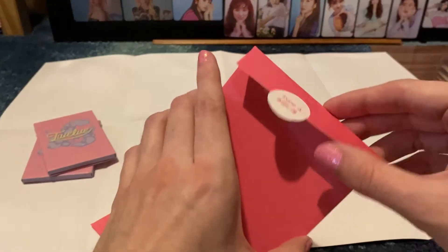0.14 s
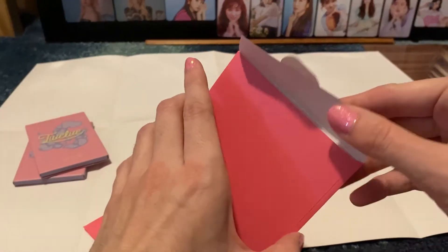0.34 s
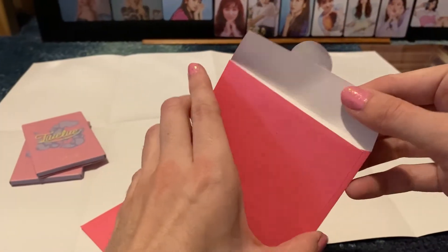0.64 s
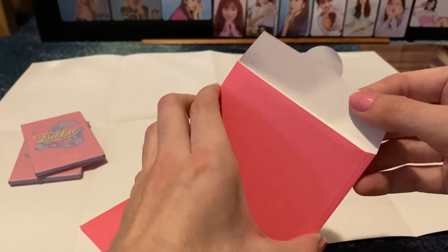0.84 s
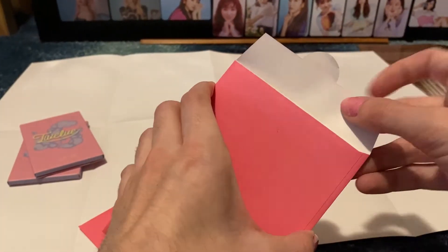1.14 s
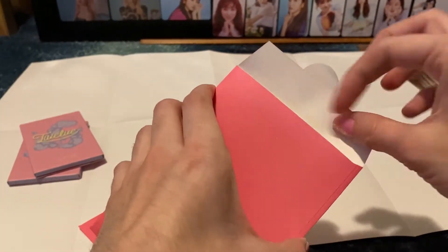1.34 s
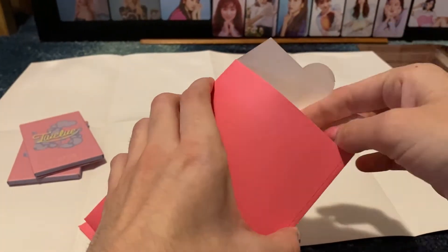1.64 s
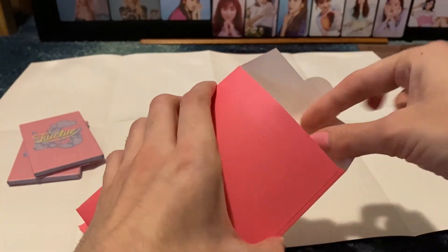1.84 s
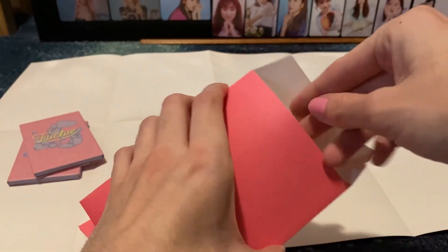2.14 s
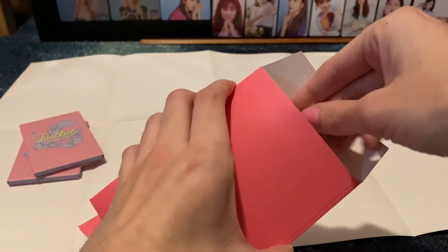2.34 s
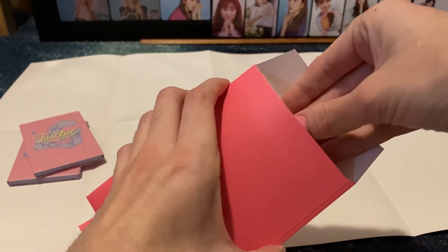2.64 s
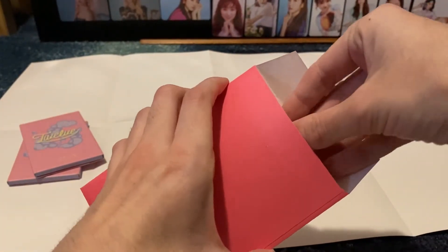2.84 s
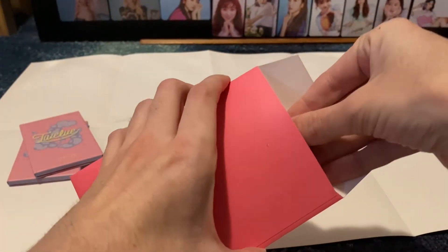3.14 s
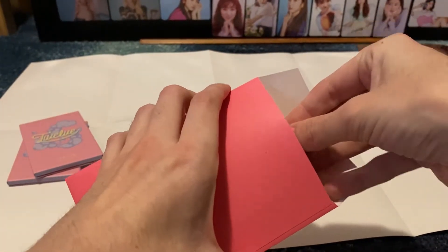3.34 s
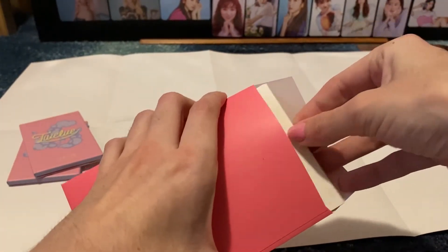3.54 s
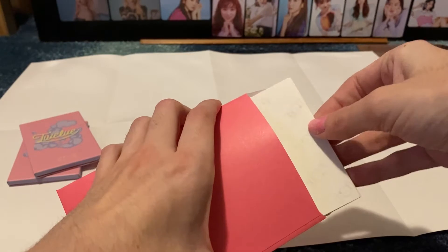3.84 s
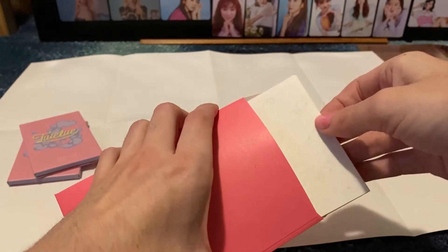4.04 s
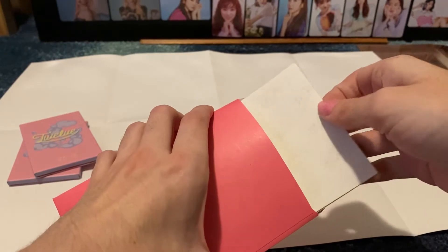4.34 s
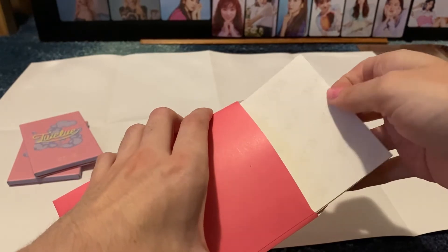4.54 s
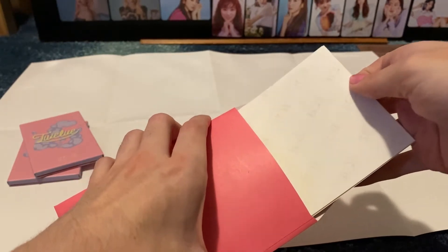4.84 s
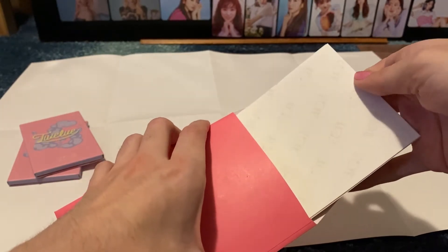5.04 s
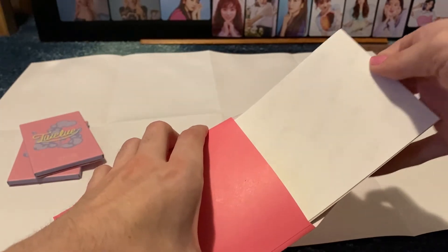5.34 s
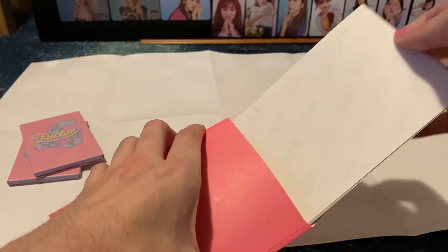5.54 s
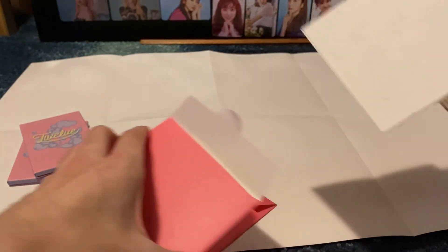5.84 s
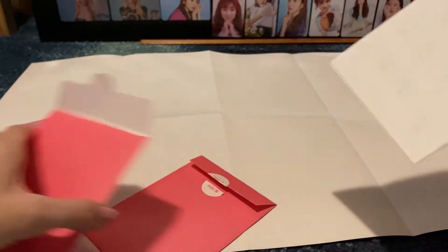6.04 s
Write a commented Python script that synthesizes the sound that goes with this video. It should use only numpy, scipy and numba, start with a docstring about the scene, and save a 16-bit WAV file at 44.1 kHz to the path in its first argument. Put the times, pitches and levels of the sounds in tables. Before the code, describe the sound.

Close dry paper handling: faint rustle, sudden crisp crackles and soft table thumps, busy scraping, a long sliding rub, then near silence.

```python
"""On a table in a quiet room, hands open the flap of a stiff paper envelope and draw out a folded card. Stick-
slip friction: paper rubs on paper as dense tiny slips that ring the sheet, pocket and fibres. Buckling: folds
give way in short crackles through the same resonances; a few even drags squeak faintly. The air cushion in the
envelope gives low thumps, each at its own pitch, over restless shaking of the table top and a quiet hush. A
phone hears it closely through two microphone ports, with a faint room tail."""
import sys
import numpy as np
from scipy import signal
from scipy.fft import rfft, irfft, next_fast_len
from scipy.io import wavfile
from scipy.ndimage import uniform_filter1d
from numba import njit

SR = 44100
rng = np.random.default_rng(int(sys.argv[2]) if len(sys.argv) > 2 else 0)


def master_out(mix):
    """Clip the mix to full scale and print it as 16-bit PCM to the path in sys.argv[1]."""
    frames = np.transpose(np.atleast_2d(mix))
    ceiling = np.clip(frames, -1, 1)
    pcm = np.round(ceiling * 32767).astype(np.int16)
    wavfile.write(sys.argv[1], SR, pcm)


N = 273772
M = next_fast_len(N)  # transform length


def undb(db):
    """Level definition: decibels to amplitude gain."""
    return 10 ** (np.asarray(db) / 20)


def unit(x):
    """Mean-square normalization: scaled to rms 1."""
    return x / np.sqrt(np.mean(x ** 2))


def curve(rows):
    """Linear interpolation in time: the columns of a (t/s, value, ..) table at every sample."""
    s, *columns = np.transpose(rows)
    return [np.interp(np.arange(N) / SR, s, c) for c in columns]


def on_bins(points):
    """Interpolation on a log frequency axis: (f/Hz, value) points at every transform bin."""
    hz, value = np.transpose(points)
    bins_hz = np.fft.rfftfreq(M, 1 / SR)
    return np.interp(np.log(bins_hz + 1), np.log(hz + 1), value)


def walk(rate):
    """Slow random modulation: levels held 1 / rate s and slewed, rms 1."""
    hold = int(SR / rate)
    steps = np.repeat(rng.standard_normal(N // hold + 1), hold)
    return unit(uniform_filter1d(steps, hold)[:N])


@njit
def band(x, hz, damping):
    """Resonance with a moving centre: a state-variable band-pass with gain 1 at the centre."""
    y, b, l = np.empty(len(x)), 0., 0.  # b and l are the band-pass and low-pass states
    for i in range(len(x)):
        g = np.tan(np.pi * hz[i] / SR)
        v = (b + g * (x[i] - l)) / (1 + g * (g + damping))
        b, l, y[i] = 2 * v - b, l + 2 * g * v, damping * v
    return y


def ring(x, modes):
    """Modal superposition: parallel resonances of alternating sign, passing white noise at rms 1."""
    def through(v):
        total = 0
        for k, (hz, width, db) in enumerate(modes):
            mode = signal.lfilter(*signal.iirpeak(hz, hz / width, SR), v)
            total = total + (-1) ** k * undb(db) * mode
        return total
    energy = np.sum(through(signal.unit_impulse(4096)) ** 2)
    return through(x) / np.sqrt(energy)


def slips(grain_db, patchy_db, rate):
    """Stick-slip friction: dense fibre slips of very uneven size, in patches as the grip wavers."""
    size_db = grain_db * rng.exponential(size=N) + patchy_db * walk(rate)
    return unit(undb(size_db) * rng.standard_normal(N))


# strokes of paper over paper: loudest at t/s, swell/s, fade/s, sheet drive level/dB,
# pitch f/Hz at which the free span of the sheet rings
STROKES = [(0.0, .05, 0.23, -67, 1960), (0.165, 0.16, 0.42, -63, 2150), (0.25, 0.086, 0.051, -74.5, 1120),
           (0.37, 0.06, 0.069, -87, 1794), (0.469, 0.04, .08, -70.5, 1860), (0.53, 0.077, 0.085, -69, 1910),
           (0.716, 0.034, 0.1, -68.5, 1950), (0.831, 0.057, 0.08, -64, 1980),
           (1.016, 0.1, 0.041, -56, 1970), (1.14, 0.39, 0.11, -64.5, 1780), (1.258, 0.14, 0.067, -68, 2400),
           (1.4, 0.092, 0.2, -77, 1510), (1.486, 0.043, 0.025, -51, 2000),
           (1.565, 0.043, 0.05, -50.5, 1560), (1.625, 0.069, .11, -50.5, 1830),
           (1.731, 0.023, 0.03, -56.5, 1720), (1.78, 0.02, 0.12, -58.5, 1950),
           (1.9, 0.071, 0.063, -72, 1720), (1.994, 0.068, 0.03, -67.5, 1580),
           (2.052, 0.065, 0.064, -71, 1960), (2.162, 0.0097, 0.1, -56.5, 1470),
           (2.275, 0.036, 0.032, -53, 1660), (2.351, 0.051, 0.14, -49.5, 1600),
           (2.431, 0.13, 0.15, -47.5, 1780), (2.62, 0.047, 0.028, -54.5, 1466),
           (2.695, 0.053, 0.056, -57.5, 2030), (2.742, 0.01, 0.085, -55, 1360),
           (2.805, .05, 0.085, -55.5, 1850), (2.88, 0.027, 0.036, -60, 1970),
           (2.936, 0.034, 0.018, -61, 1520), (2.965, .02, 0.14, -60.5, 1510), (3.09, .04, 0.05, -77, 1650),
           (3.174, 0.045, 0.069, -66.5, 1780), (3.274, 0.052, 0.079, -53, 1900),
           (3.372, 0.03, 0.069, -53.5, 1950), (3.44, 0.027, 0.057, -56, 2310),
           (3.51, 0.093, 0.09, -53, 2000), (3.644, 0.21, 0.018, -48, 2100),
           (3.725, 0.092, 0.084, -53, 2070), (3.822, 0.042, 0.019, -50, 1840),
           (3.86, 0.044, .03, -69, 1800), (3.89, 0.016, 0.1, -57, 1800), (3.961, 0.041, 0.013, -49.5, 2330),
           (3.99, 0.048, 0.41, -60, 2040), (4.3, 0.12, 0.26, -57.5, 1930), (4.369, 0.21, 0.04, -55, 2070),
           (4.45, 0.078, 0.073, -63.5, 1850), (4.502, 0.027, 0.23, -55.5, 1820),
           (4.684, 0.21, 0.12, -54.5, 1980), (4.819, 0.14, 0.053, -63, 1530),
           (4.9, 0.068, 0.079, -60, 1170), (5.009, 0.013, 0.053, -67.5, 1510),
           (5.045, 0.014, .03, -76, 1250), (5.14, 0.031, 0.099, -74, 1310), (5.28, 0.097, 0.17, -57, 1100),
           (5.38, 0.04, 0.073, -58.5, 920), (5.47, 0.15, 0.055, -60.5, 930),
           (5.546, 0.089, 0.062, -50, 1840), (5.6, .03, 0.044, -75, 916), (5.981, .025, 0.092, -79, 1820),
           (6.09, 0.078, 0.073, -74, 1820), (6.149, 0.02, .045, -70, 2100),
           (6.21, 0.071, 0.041, -70.5, 1920)]
SWELL_POWER, FADE_POWER = 0.99, 1.31  # 1 = straight ramp in amplitude, more = more pointed
REST_DB, REST_HZ = -97.5, 1700  # paper barely touching


def strokes():
    """Power addition: swelling and fading strokes sum in power, and the stronger weigh more in pitch."""
    t = np.arange(N) / SR
    power = np.full(N, undb(2 * REST_DB))
    octaves = power * np.log2(REST_HZ)
    for s, swell, fade, db, hz in STROKES:
        up = np.clip(1 + (t - s) / max(swell, .002), 0, 1) ** SWELL_POWER
        down = np.clip(1 - (t - s) / max(fade, .002), 0, 1) ** FADE_POWER
        own = (undb(db) * up * down) ** 2
        power = power + own
        octaves = octaves + own * np.log2(hz)
    return 10 * np.log10(power), 2 ** (octaves / power)


# what rubs: t/s, hollow pocket level/dB, fibre hiss level/dB,
# both relative to the sheet drive of a middling stroke
SURFACE = [(0.0, -1.5, 1.5), (0.15, -5, -7), (0.25, -5, -0.5), (0.36, -13.5, -11.5), (0.47, -17, 6),
           (0.95, -12, -4.5), (1.2, -11, 1.5), (1.55, -6.5, 0), (1.75, -12.5, -9), (2.05, -14, -4),
           (2.2, -7, -10), (2.47, -8, -7), (2.62, -13.5, -9), (2.96, -10, -6), (3.15, -19.5, -11),
           (3.4, -13, -6), (3.62, -13, -10.5), (3.95, -17.5, -7), (4.2, -14, -11), (4.75, -11.5, -7.5),
           (5.1, -7, -8.5), (5.5, -7.5, -8.5), (5.6, -0.5, -6), (5.68, -13.5, -1), (5.95, -14, 0),
           (6.21, -20.5, 0.5)]
MIDDLING_DB = -62
POCKET_FOLLOW, HISS_FOLLOW = 0.55, 0.98  # dB gained per dB of sheet drive


def rubbing(ring_db):
    """Friction excitation: slips drive sheet, pocket and fibres; catches jolt sheet and fibres together."""
    pocket_db, hiss_db = curve(SURFACE)
    effort_db = ring_db - MIDDLING_DB
    catches = undb(1.1 * walk(160))
    pocket_gain = undb(MIDDLING_DB + pocket_db + POCKET_FOLLOW * effort_db)
    hiss_gain = undb(MIDDLING_DB + hiss_db + HISS_FOLLOW * effort_db)
    return [undb(ring_db) * catches * slips(1.4, 1.0, 45),
            pocket_gain * slips(1.3, 3.9, 30),
            hiss_gain * catches * slips(1.2, 1.2, 60)]


# sudden cracks of a fold: t/s, envelope peak level/dB before the crest allowance,
# pocket level/dB and hiss level/dB relative to it, ringing pitch f/Hz, decay time constant/ms
CRACKS = [(0.0655, -46, -32, 0, 2170, 0.94), (1.4529, -35.5, 1, -9.5, 1100, 3.6),
          (1.491, -25, -1.5, -22, 1900, 3.6), (1.5418, -24, -2, -16, 1420, 3.4),
          (1.731, -43, -26, -22, 1670, 2.2), (1.7726, -56, -7.5, -12, 2000, 3.3),
          (1.8057, -48, -15, -4, 2120, 3), (1.9808, -53.5, -13, -16, 1450, 6.8),
          (2.0393, -52, -21.5, -7, 1960, 2), (2.1513, -35, -12.5, -8, 1500, 3.6),
          (2.1876, -38.5, -5, -42, 1350, 8.4), (2.194, -43, 8.5, -15, 1360, 3.6),
          (2.2098, -22, -7.5, -8.5, 1600, 6.7), (2.231, -31, -28, -4.5, 2490, 6.7),
          (2.3081, -36.5, -0.5, -7.5, 1580, 1.6), (2.587, -46, -24, -21, 1440, 2.2),
          (2.741, -44.5, -19, -19, 1450, 3.3), (2.9405, -28.5, -12.5, -13.5, 1400, 6.7),
          (3.0453, -46.5, -29.5, -23.5, 1690, 1.3), (3.2198, -48.5, -24, -28.5, 1380, 2.7),
          (3.313, -44.5, -10, -30, 1640, 3.4), (3.8816, -44, -20, -5.5, 1790, 3.5),
          (4.5975, -46.5, -11, -23, 1500, 2.3), (5.008, -53, -24, -10, 1510, 2.8),
          (5.038, -57, -5, -22.5, 1250, 3.1)]
# scrunches that swell first: same columns
SCRUNCHES = [(1.5012, -28.5, -6.5, -3.5, 2370, 9.2), (1.5222, -21, -7.5, -21, 1510, 7),
             (1.5292, -18, -19, -17, 1450, 4.1), (1.5505, -35.5, -1, -14, 1620, 6),
             (1.6072, -38.5, -29, -7.5, 1710, 3.1), (2.2179, -31, -12.5, -6.5, 1550, 4.4),
             (2.223, -34.5, 2, -23, 1360, 10.3), (2.2425, -35.5, 0, -8, 2560, 7.2),
             (2.255, -40.5, -4.5, -10, 1380, 7.1), (2.2694, -48, -12, -3, 1440, 3),
             (2.3984, -41, -15, -19, 1840, 2.1), (2.7515, -49, -13, -24, 1440, 5.9),
             (2.785, -43.5, -8.5, -14, 2530, 10.7), (2.9504, -51, -21, -25, 1360, 2.4),
             (3.3628, -49.5, -28.5, -14, 1860, 12), (3.6365, -31.5, -19, -13, 2360, 2.8),
             (3.8211, -38.5, -13, -32, 1540, 2.6), (3.9578, -35.5, -48, -3.5, 2550, 6.1),
             (5.5393, -36, -21, -11, 2390, 2.9), (5.58, -48.5, 0.5, -14, 2140, 3.1)]
CRACK_RISE_MS, SCRUNCH_RISE_MS = 0.28, 1.5
SNAP_DB = 7.5  # first click of a crack above its crackle envelope
CRACKLE_CREST_DB = 6  # crest allowance: all buckle forces are lowered by this


def buckles(span_hz):
    """Buckling instability: brief crackling forces, each setting the ringing span for 15 ms."""
    age_ms = np.arange(2048) / SR * 1000
    force, span_hz = np.zeros((3, N)), span_hz.copy()
    rows = [(*r, CRACK_RISE_MS) for r in CRACKS] + [(*r, SCRUNCH_RISE_MS) for r in SCRUNCHES]
    for s, db, pocket_db, hiss_db, hz, fall, rise in sorted(rows):
        shape = (1 - np.exp(-age_ms / max(rise, .05))) * np.exp(-age_ms / max(fall, .5))
        gains = undb([db, db + pocket_db, db + hiss_db])
        i = int(s * SR)
        force[:, i:i + 2048] += np.outer(gains, shape / shape.max())
        span_hz[i:i + int(.015 * SR)] = hz
    force = force * [slips(1.1, 1.3, 300), slips(1.0, 4.0, 200), slips(1.3, 1.2, 400)]
    # each crack snaps once, 0.6 ms after its onset
    for s, db, pocket_db, hiss_db, *_ in CRACKS:
        levels_db = np.array([db, db + pocket_db, db + hiss_db])
        force[:, int((s + .0006) * SR)] -= undb(levels_db + SNAP_DB)
    return undb(-CRACKLE_CREST_DB) * force, span_hz


# bending modes of the sheet at rest: f/Hz, width/Hz, relative level/dB before the span weighting
SHEET = [(940, 200, -4), (1177, 160, -0.5), (1448, 108, 3), (1786, 240, -1), (2116, 150, 2.5),
         (2352, 325, 2.5), (2586, 420, 1.5), (3120, 210, -2)]
# resonances of the hollow pocket: f/Hz, width/Hz, relative level/dB
POCKET = [(239, 90, 1.5), (424.6, 420, 1), (572, 338, 4), (837, 340, -5)]
# broad resonances of the fibres: f/Hz, width/Hz, relative level/dB
FIBRES = [(3630, 710, -4.5), (4880, 1200, -4.5), (6930, 2150, -3), (10360, 4760, -7.5), (12930, 4060, -9.5)]


def paper(force, span_hz, bend):
    """Modal response: forces ring sheet, pocket and fibres; bending shifts and weights each sheet mode."""
    sheet, power = 0, 0
    for k, (hz, width, db) in enumerate(SHEET):
        # pitch takes the neighbouring mode's bend, weight takes the mode's own
        mode = band(force[0], hz * (1 + 0.041 * bend[k - 1]), width / hz)
        # modes far from the pitch of the free span are held still
        octaves_off = np.log2(hz / span_hz)
        weight = undb(db + 2.2 * bend[k] - 8.64 * octaves_off ** 2)
        sheet = sheet + (-1) ** k * weight * mode
        power = power + weight ** 2 * np.pi * width / SR
    # the same force is shared among whichever modes are free
    return sheet / np.sqrt(power) + ring(force[1], POCKET) + ring(force[2], FIBRES)


# even drags on which the sheet sings: start t/s, length/s, level/dB, f/Hz
SQUEAKS = [(0.0, 0.24, -73, 2130), (0.01, 0.18, -68, 3070), (1.28, .14, -80.5, 1530),
           (2.582, 0.069, -63.5, 1430), (2.74, 0.035, -55.5, 1440)]
SQUEAK_DAMPING = .05  # bandwidth / centre frequency


def squeaks():
    """Narrow-band friction tones: noise through a sharp resonance, under a half-sine swell."""
    t, out = np.arange(N) / SR, 0
    for s, length, db, hz in SQUEAKS:
        swell = np.sin(np.pi * np.clip((t - s) / length, 0, 1))
        tone = unit(band(rng.standard_normal(N), np.full(N, 1. * hz), SQUEAK_DAMPING))
        out = out + undb(db) * swell * tone
    return out


# thumps of the air cushion in the envelope: t/s, level/dB before the rise and decay, f/Hz
THUMPS = [(0.05, -47.5, 120), (1.458, -44, 136), (1.469, -36.5, 93), (1.532, -28, 239),
          (1.543, -28.5, 72.5), (1.791, -60, 67), (2.155, -49, 100), (2.217, -47, 233),
          (2.227, -24.5, 93.4), (2.417, -55, 111), (2.585, -53.5, 132), (2.946, -50.5, 104),
          (3.62, -52, 125.3), (3.831, -53.5, 114), (4.905, -55.5, 125.5), (5.01, -64.5, 69.7),
          (5.736, -48.5, 121.6), (5.74, -52, 201.4), (5.748, -41, 62.1), (5.869, -66, 97.7)]
THUMP_CYCLES = 7.1  # to fade by 60 dB


def thumps():
    """Damped free vibration: each thump of the envelope's air cushion starts a decaying sine at its own pitch."""
    out = np.zeros(N)
    age = np.arange(SR // 4) / SR
    for s, db, hz in THUMPS:
        decay = 1000 ** (-age * hz / THUMP_CYCLES)
        rise = 1 - np.exp(-age / 0.002)
        i = int(s * SR)
        out[i:i + len(age)] += undb(db) * np.sin(2 * np.pi * hz * age) * decay * rise
    return out


# modes of the table top: f/Hz, width/Hz, relative level/dB
TABLE = [(53, 15, 3.5), (103, 72.5, -1), (166, 110, -4.5), (227.8, 51, -11.5)]
# restless hands on the table: t/s, level/dB about which it wavers
SHAKE = [(0.0, -64), (0.41, -74.5), (0.8, -79.5), (1.11, -68), (1.5, -75), (2.1, -76), (2.3, -58.5),
         (2.5, -68), (3.08, -77.5), (3.25, -67.5), (3.85, -70.5), (4.38, -78.5), (4.74, -71), (5.1, -72.5),
         (6.21, -76)]


def shaking():
    """Random forcing of modes: wavering noise from restless hands rings the table top."""
    level_db = curve(SHAKE)[0] + 2 * walk(12)
    return undb(level_db) * ring(rng.standard_normal(N), TABLE)


# spectrum of the room hush: f/Hz, relative level/dB per Hz
AIR = [(18, -44), (30, 5), (88, -9), (184, -18.5), (287, -13.5), (684, -40), (780, -23.5), (6210, -35),
       (7090, -33), (16000, -45.5)]
AIR_DB = -80


def air():
    """Stationary filtered noise: the quiet room hush."""
    spectrum = rfft(rng.standard_normal(M)) * undb(on_bins(AIR))
    return undb(AIR_DB) * unit(irfft(spectrum, M)[:N])


def tail(t60):
    """Diffuse reverberation: a noise response of unit energy that fades by 60 dB in t60 s."""
    age = np.arange(SR // 2) / SR
    h = rng.standard_normal(len(age)) * 1000 ** (-age / t60)
    return h / np.sqrt(np.sum(h ** 2))


# unequal paths to the two ports: f/Hz, phase by which the left port leads/rad
PORTS = [(1200, 0), (2400, .25), (4300, .7), (5200, .3), (6400, 2.4), (7250, 3.14), (8200, 3.7),
         (10300, 6.28), (11200, 6.6), (12500, 8.7), (13600, 9.42), (14500, 9.9), (16000, 12.6)]
# unrelated side sound: f/Hz, level/dB
SPREAD = [(60, -38), (150, -5), (350, -4.5), (800, -1), (1400, -17.5), (2500, -5.5), (5000, -8),
          (16000, -28.5)]
ROOM_T60_S, ROOM_DB = .45, -28.5
SCATTER_T60_S = 0.054
BUCKLE_SPREAD_DB = -6.5  # a buckle is one spot, so it scatters less than a rubbing face
PAN_DB = .42  # right up and left down by this; the paper lies a little to the right


def scene():
    """Superposition and interference: all sources as two close microphone ports hear them."""
    ring_db, span_hz = strokes()
    bend = np.array([walk(11) for _ in SHEET])
    rub = paper(rubbing(ring_db), span_hz, bend) + squeaks() + air()
    hits = paper(*buckles(span_hz), 0.15 * bend) + thumps() + shaking()
    direct = rub + hits
    near = direct + undb(ROOM_DB) * signal.fftconvolve(direct, tail(ROOM_T60_S))[:N]
    # sound scattered by hands and table reaches the ports unalike
    loose = signal.fftconvolve(rub + undb(BUCKLE_SPREAD_DB) * hits, tail(SCATTER_T60_S))[:N]
    scattered = rfft(loose, M) * undb(on_bins(SPREAD))
    # unequal paths to the ports turn the phase, so their sum has notches
    turn = np.exp(.5j * on_bins(PORTS))
    left = irfft(rfft(near, M) * turn + scattered, M)[:N]
    right = irfft(rfft(near, M) / turn - scattered, M)[:N]
    return np.array([undb(-PAN_DB) * left, undb(PAN_DB) * right])


MIC_DB = 2
BASS_HZ, TOP_HZ = 45, 15850


def record(dry):
    """Band limitation: the phone applies its gain and cuts the deepest bass and the top."""
    bass_cut = signal.butter(2, BASS_HZ, "high", fs=SR, output="sos")
    top_cut = signal.ellip(10, .2, 70, TOP_HZ, fs=SR, output="sos")
    dry = signal.sosfilt(bass_cut, undb(MIC_DB) * dry)
    return signal.sosfilt(top_cut, dry)


dry = scene()
out = record(dry)
master_out(out)
```